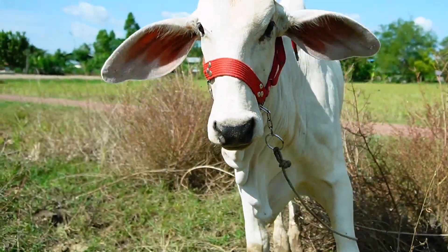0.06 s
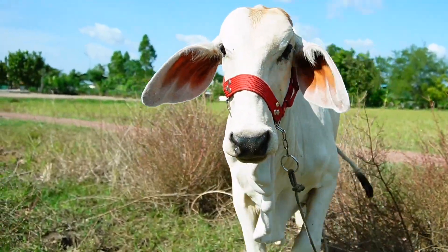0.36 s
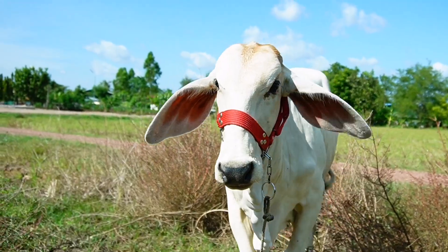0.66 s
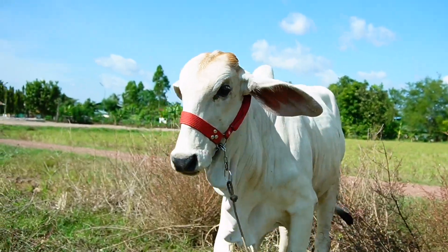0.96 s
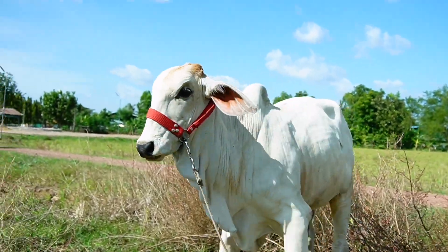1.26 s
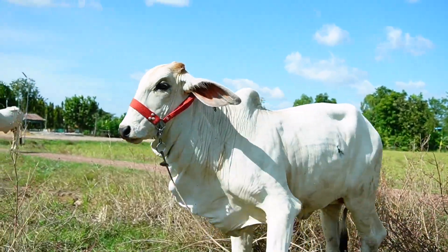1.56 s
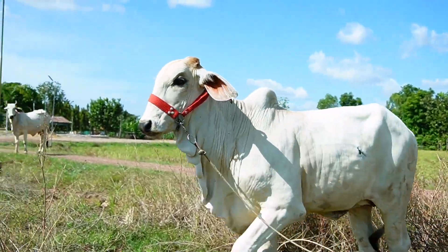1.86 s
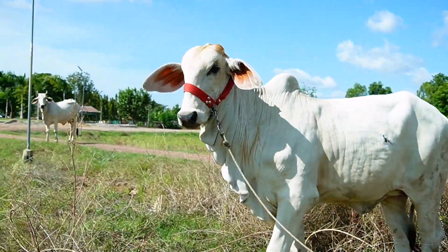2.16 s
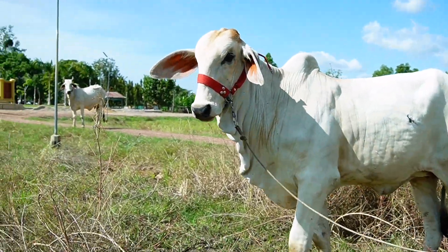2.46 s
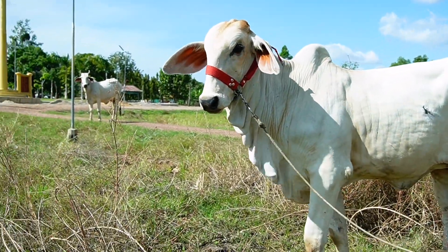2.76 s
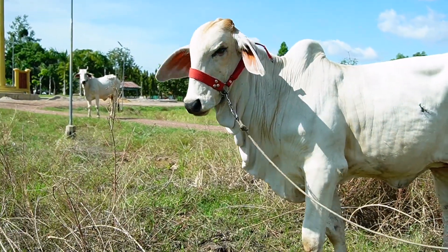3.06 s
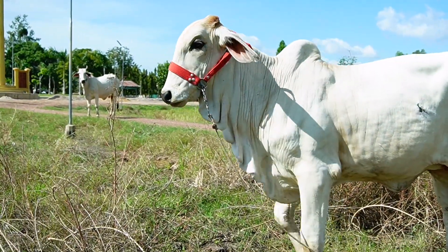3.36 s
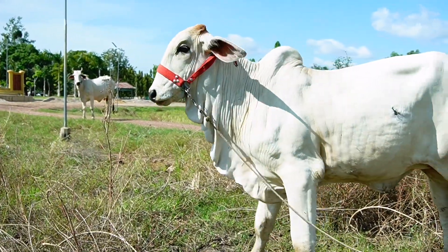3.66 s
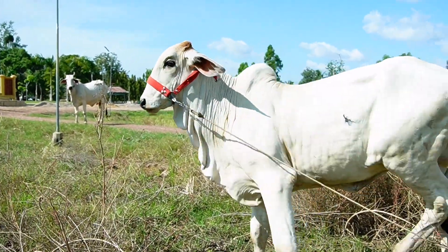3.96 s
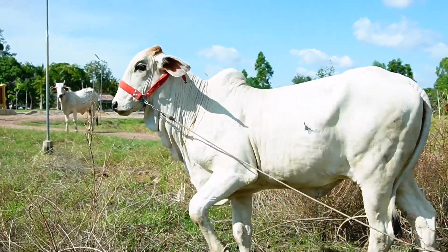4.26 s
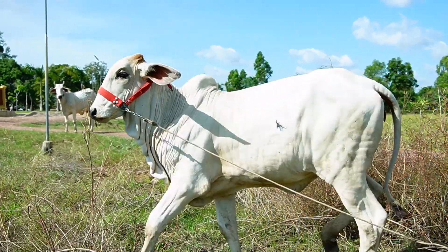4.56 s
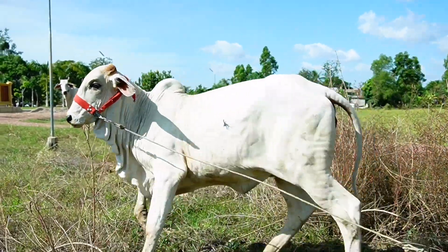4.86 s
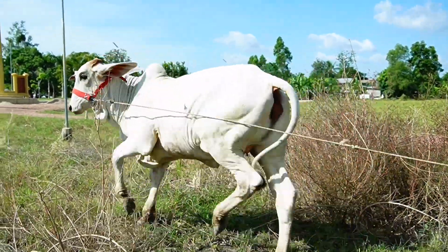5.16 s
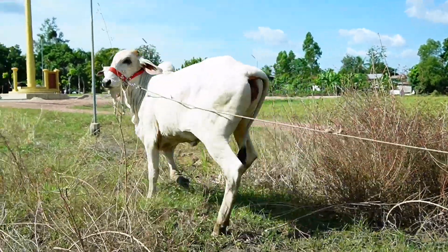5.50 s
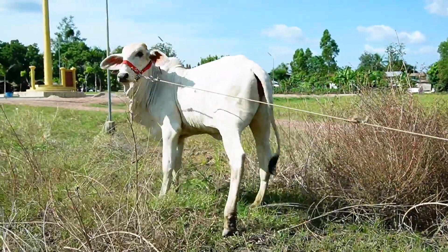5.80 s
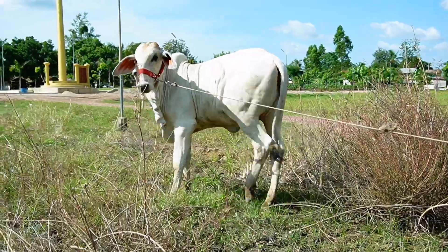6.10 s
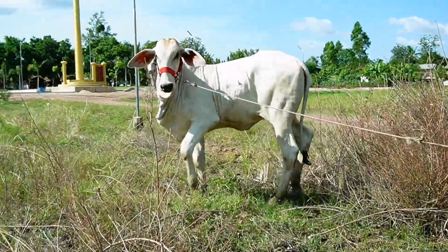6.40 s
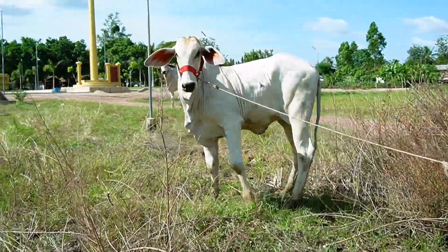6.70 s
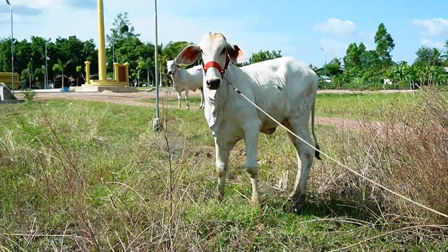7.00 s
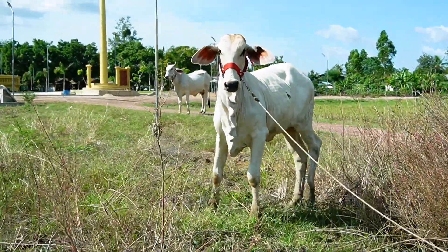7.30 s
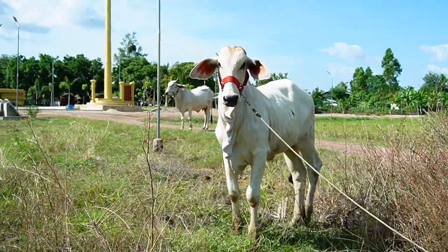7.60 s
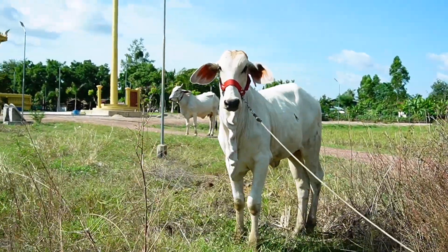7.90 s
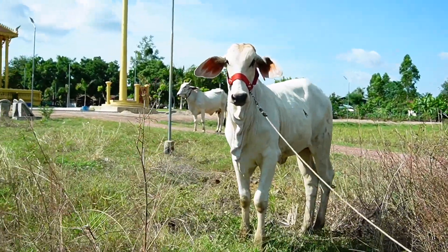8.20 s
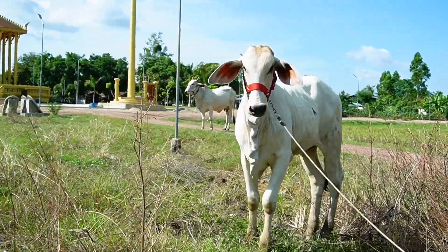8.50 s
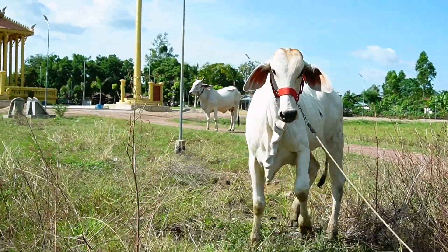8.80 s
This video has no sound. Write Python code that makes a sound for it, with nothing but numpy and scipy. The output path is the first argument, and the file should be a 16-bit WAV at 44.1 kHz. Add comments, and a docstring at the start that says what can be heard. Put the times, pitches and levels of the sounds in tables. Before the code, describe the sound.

Close, irregular rustling and crackling of dry grass comes from a tethered calf walking about, with sharp snaps and a few woody knocks from breaking stems. The steps are light at first, loudest and busiest just past the middle, and then more spaced out. Small birds give quick gliding chirps and faint whistles across the open field, while distant traffic drones low under soft wind.

```python
"""A tethered calf walks through dry grass, close by in an open field.
Its legs and rope rustle the blades, its hooves crunch the straw, and single stalks snap and knock:
dense trains of tiny fractures, and sharp cracks with a brief ring. Small birds chirp around the
field in quick gliding tones, over the rumble and drone of far traffic, soft gusts and a faint hiss."""
import sys
import numpy as np
from scipy import signal
from scipy.fft import rfft, irfft, next_fast_len
from scipy.io import wavfile

SR = 44100
rng = np.random.default_rng(int(sys.argv[2]) if len(sys.argv) > 2 else 0)


def unload_audio(sound):
    """Save the sound as a 16-bit wav file, at the path given as the first command line argument."""
    columns = np.transpose(np.atleast_2d(sound))
    # keep every value between -1 and 1, then stretch to whole-number steps
    steps = np.round(np.clip(columns, -1, 1) * 32767)
    wavfile.write(sys.argv[1], SR, steps.astype(np.int16))


N = 390285
TIME = np.arange(N) / SR


# Steady drag through the grass: t/s, level/dB
DRAG_LEVEL = [(0, -57), (.45, -61.5), (.8, -64.5), (1.2, -66), (1.5, -51.5), (2.25, -68.5), (2.85, -73),
              (3.35, -65), (4.05, -65), (4.15, -51), (4.6, -51), (5.7, -51), (5.9, -55), (6.7, -52.5),
              (6.95, -57.5), (7.7, -50.5), (8.05, -62), (8.5, -64), (8.85, -47)]
# Sweeps through a clump: peak t/s, length/s, blades/dB, straw/dB
CLUMP_SWISHES = [(0.244, 0.11, -48, -53), (0.537, 0.042, -53, -50), (0.655, 0.02, -50.5, -47.5),
                 (1.366, 0.09, -52.5, -49), (1.564, 0.051, -48, -45.5), (2.024, 0.022, -53, -53),
                 (3.776, 0.051, -60, -57), (4.667, 0.1, -40.5, -46.5), (4.881, 0.11, -43.5, -47.5),
                 (5.023, 0.017, -38, -42), (5.2, 0.16, -41, -46.5), (5.28, 0.067, -31.5, -42.5),
                 (5.392, 0.066, -37.5, -43.5), (5.571, 0.057, -41, -49), (5.672, 0.095, -38.5, -64),
                 (5.812, 0.091, -50, -52), (5.992, 0.046, -49, -43.5), (6.51, 0.16, -52, -69),
                 (6.646, 0.075, -50, -70), (6.745, 0.084, -44.5, -52), (7.642, 0.059, -46, -59),
                 (8.23, 0.1, -52.5, -47.5), (8.84, 0.063, -46.5, -61)]
def stir():
    """Legs and rope drag and swish through the grass; returns straw and blade levels in dB."""
    even_db, straw_follow = -54, 0.57
    rise_share = 0.46
    drag_db = np.interp(TIME, *np.transpose(DRAG_LEVEL))
    straw_power = gain_of(even_db + straw_follow * (drag_db - even_db)) ** 2
    blade_power = gain_of(drag_db) ** 2
    for s, length, blades_db, straw_db in CLUMP_SWISHES:
        near = slice(max(round((s - 2 * length) * SR), 0), round((s + 2 * length) * SR))
        u = (TIME[near] - s) / length
        swell = np.exp(-np.maximum(-u / rise_share, u / (1 - rise_share)) ** 1.25)
        straw_power[near] += gain_of(straw_db) ** 2 * swell
        blade_power[near] += gain_of(blades_db) ** 2 * swell
    return 10 * np.log10(straw_power), 10 * np.log10(blade_power)


# Coarse straw and fine blades: f/Hz, level/dB
STRAW_SPECTRUM = [(300, -7), (700, -12), (1150, -3), (2000, -3), (3200, -1.5), (4800, -2.5), (7000, -16.5),
                  (15000, -32)]
BLADE_SPECTRUM = [(1000, -19), (2500, 2), (4000, 4), (6500, 2), (10000, -1.5), (13000, -5), (16000, -9)]
def rustle():
    """Stirred straw and blades rub and crackle in clumps; single fibres tick above them."""
    straw_db, blades_db = stir()
    clumps = drift(23)
    ticks = spread(cracks(per_s=170, spread_db=5), apart=0.37)
    straw_rub = spread(cracks(per_s=5000, spread_db=0.5), apart=0.16)
    blade_rub = spread(cracks(per_s=8500, spread_db=-1), apart=0.7)
    straw = unit_rms(colour(straw_rub + 0.36 * ticks, STRAW_SPECTRUM))
    blades = unit_rms(colour(blade_rub, BLADE_SPECTRUM)) + gain_of(-7.5) * fibres()
    straw *= gain_of(straw_db + 2 * clumps + 4)
    blades *= gain_of(blades_db + 1.33 * clumps + 1.68)
    return straw + blades


def fibres(pitches=24, per_s=110, decay_s=0.00031):
    """Dry fibres tick as they slip or break, at many pitches and places, roughened by splinters."""
    t, out = TIME[:SR // 100], np.zeros((2, N))
    for hz in np.geomspace(2100, 12300, pitches):
        ring = np.sin(2 * np.pi * hz * t) * np.exp(-t / decay_s)
        splinters = (t == 0) + 0.074 * rng.standard_normal((2, len(t))) * np.exp(-t / 0.004)
        tick = signal.fftconvolve(splinters, ring[None], axes=1)
        for when, size, side in rng.random((round(per_s * N / SR / pitches), 3)):
            pan = np.sqrt([[.5 + side], [1.5 - side]])
            add(out, when * N / SR, gain_of(14 * size ** 2) * tick * pan)
    return unit_rms(out)


# Crushed tufts: t/s, length/s, level/dB, tilt/(dB/octave)
HOOF_CRUNCHES = [(0.293, 0.019, -38.5, 3), (0.559, .006, -46, 2), (0.644, 0.046, -38.5, -13.5),
                 (1.262, 0.032, -47, 0), (1.337, 0.023, -39, 2), (1.535, 0.013, -38.5, 6),
                 (1.567, .012, -40, 14), (2.009, 0.014, -42.5, 2), (4.035, 0.0072, -43, -5),
                 (4.104, 0.0055, -42, -1), (4.206, 0.02, -44.5, -3), (4.602, 0.0079, -42, -7),
                 (4.67, 0.0091, -32.5, 5), (4.687, 0.0046, -36, 8), (4.829, .006, -36, 10),
                 (4.888, 0.011, -37, 2.5), (4.991, 0.0097, -40, 16), (5.022, 0.018, -33.5, -5.5),
                 (5.093, 0.0058, -37.5, 2), (5.169, 0.047, -33, 7.5), (5.253, 0.015, -26.5, 12),
                 (5.283, 0.023, -27, 17), (5.285, 0.026, -31, -1.5), (5.327, 0.021, -31, 16),
                 (5.37, 0.0034, -13.5, 6), (5.679, 0.016, -38, 5), (5.759, 0.0073, -36, 7),
                 (5.97, 0.025, -45, -4), (6.626, 0.0055, -36, 12), (6.667, 0.0036, -39, 7),
                 (7.631, 0.0037, -33.5, 19), (7.648, 0.0032, -33, 13), (7.672, .008, -39, 6),
                 (7.933, 0.0061, -38.5, 1)]
# Breaking tuft: f/Hz, level/dB
TUFT_SPECTRUM = [(200, 6.5), (600, -10), (1100, 7), (1600, 1), (3000, 11.5), (6000, 4.5), (11000, -9),
                 (16000, -22)]
def crunches():
    """A hoof breaks a whole tuft: a dense burst of fractures that swells fast and dies away."""
    out = np.zeros((2, N))
    for s, length, db, tilt_db in HOOF_CRUNCHES:
        u = TIME[:SR // 4] / length
        fractures = spread(cracks(per_s=9100, spread_db=1.5, size=len(u)), apart=0.24)
        burst = unit_rms(colour(fractures, TUFT_SPECTRUM, tilt_db))
        envelope = (1 - np.exp(-u / 0.016)) * np.exp(-u ** 4)
        add(out, s, gain_of(db) * burst * envelope)
    return out


# Breaking stalks, and one hoof knock at 5.297 s: t/s, level/dB, ring f/Hz, low knock/dB, high crack/dB
STALK_SNAPS = [(.178, -21, 3940, -34, -42), (.477, -35, 6000, -30, -16), (0.4921, -23.5, 3800, -27, -38),
               (0.5415, -22, 4500, -44, -22), (.9033, -30, 3650, -14, -18), (1.4565, -12, 3230, -26, -19),
               (1.4864, -14, 3730, -27, -14), (1.5933, -10.5, 7600, -36, -11),
               (1.761, -11, 4170, -23, -17.5), (1.808, -15.5, 3400, -16, -13.5),
               (1.832, -26, 2700, -16, -36), (2.041, -9, 4150, -23, -21.5), (2.076, -20, 1170, -12, -15),
               (2.393, -22.5, 3050, -12.5, -30), (2.676, -27, 2160, -12, -35),
               (3.273, -25.5, 4750, -22, -39), (3.457, -22, 2150, -12, -35),
               (3.7345, -26.5, 2290, -37, -24), (3.8623, -22.5, 4100, -27, -31),
               (4.7863, -13, 9140, -22, -18), (5.1704, -10, 3150, -16, -21), (5.2568, -14, 3200, -18, -10),
               (5.2692, -6, 4500, -28, -17), (5.286, -12, 2620, -11, -6), (5.297, -12, 1100, -8, -25),
               (5.3554, -12.5, 3960, -21, -9), (5.3715, -8, 3800, -32, 9), (5.461, -15, 5260, -36, -24),
               (5.6628, -2.5, 11550, -33, -2.5), (6.087, -20.5, 4130, -7, -11),
               (6.133, -18.5, 2600, -14, -63), (6.4376, -16, 3180, -20, -8), (6.5178, -21, 6460, -27, -5),
               (6.522, -13, 4860, -26, -12), (6.526, -17, 5600, -30, -9), (6.6199, -18, 10500, -37, -6),
               (6.7163, -19, 4770, -18, 1), (6.7407, -3.5, 3300, -39, 7), (6.83, -24.5, 2200, -4, -38),
               (7.047, -10.5, 3350, -18.5, -21), (7.206, -21, 2700, -10, -31), (7.795, -20, 4300, -30, -26),
               (7.9343, -22, 3660, -10, -33), (8.0285, -28, 6200, -22, -19), (8.1695, -23, 3400, -4, -12),
               (8.274, -12.5, 3420, -20.5, -17), (8.7081, -9, 4800, -34, -13)]
def snaps(twigs=14):
    """Thick stalks break, a hoof knocks once, and a few thin twigs snap at random moments."""
    out = np.zeros((2, N))
    for s, *stalk in STALK_SNAPS:
        add(out, s + 0.001002, snap(*stalk))
    for when, size, pitch in rng.random((twigs, 3)):
        twig = snap(db=-36 + 5 * size, hz=2200 + 2400 * pitch, knock_db=-17.5, crack_db=-35)
        add(out, when * N / SR, twig)
    return out


def snap(db, hz, knock_db, crack_db):
    """A stalk cracks, splinters and rings briefly; the thick stem below the break knocks."""
    t = TIME[:SR // 16]
    splinters = spread(rng.standard_normal((3, len(t))), apart=0.37)
    splinters *= np.exp(-t / 0.0016) + 0.19 * np.exp(-t / 0.011)
    spectrum = [(120, knock_db - 37), (500, knock_db + 1), (1200, knock_db + 10),
                (4000, 0), (11000, crack_db + 10), (16000, crack_db)]
    crack = colour((t == 0) + 0.12 * splinters, spectrum)
    crack /= np.linalg.norm(crack[0])
    ring_t60_s, stem_t60_s = 0.017 * np.sqrt(4000 / hz), 0.014
    ring = np.sin(2 * np.pi * hz * t) * gain_of(-60 * t / ring_t60_s) * (1 - np.exp(-t / 0.00019))
    ring *= 0.45 / np.linalg.norm(ring)
    stem_hz = 1363 * rng.uniform(0.82, 1.144)
    stem = np.sin(2 * np.pi * stem_hz * t) * gain_of(-60 * t / stem_t60_s)
    stem *= gain_of(min(knock_db + 4, -7)) / np.linalg.norm(stem)
    return gain_of(db + 5.5) * (crack + ring + stem)


# Hollow stems, and a hoof knock at 5.297 s: t/s, f/Hz, decay/s, level/dB
STEM_KNOCKS = [(1.762, 1390, 0.0057, -32), (2.042, 1380, 0.011, -37), (2.077, 1150, 0.0033, -39),
               (5.027, 1180, 0.008, -36), (5.281, 1110, 0.018, -34), (5.297, 1060, 0.0039, -29),
               (5.370, 720, 0.0051, -34.5)]
def knocks(wander_hz=100):
    """Hollow stems give way, and a hoof strikes, with a short, rough, woody knock."""
    t, out = TIME[:SR // 8], np.zeros((2, N))
    for s, hz, decay_s, db in STEM_KNOCKS:
        ring = tone(hz + wander_hz * drift(430, size=len(t)))
        envelope = (1 - np.exp(-t / .0005)) * np.exp(-t / decay_s)
        add(out, s, gain_of(db) * ring * envelope)
    return out


# Two-syllable calls: t/s, delay of second/s, first f/Hz, level/dB, second f/Hz, level/dB
FALLING_CALLS = [(1.245, .03, 5190, -46, 3800, -45), (2.636, 0.044, 4840, -43.5, 3950, -43.5),
                 (4.298, 0.048, 5200, -48, 3780, -37.5), (4.522, 0.044, 5120, -44, 3600, -42),
                 (7.114, 0.049, 5100, -38.5, 4100, -35.5), (7.322, 0.05, 5020, -40, 4030, -37.5),
                 (8.549, 0.04, 5100, -41.5, 3840, -36), (8.72, 0.052, 4650, -36.5, 3760, -34.5)]
# Plunging warble; upward sweep with a low tail: t in call/s, f/Hz, level/dB
WARBLE_CONTOUR = [(0, 6380, -18), (.009, 5007, -0.5), (.016, 4570, -2), (.021, 4954, 5.5), (.028, 3894, -9),
                  (.036, 4526, -5), (.042, 3600, -4), (.062, 3180, -6), (.09, 2840, -15)]
SWEEP_CONTOUR = [(0, 3200, -13), (.021, 4300, -4), (.03, 5400, -11), (.04, 4100, -2), (.051, 3406, -3),
                 (.068, 3100, -4.5), (.083, 2560, -13), (.105, 2330, -11)]
# Calls on those contours: t/s, pitch ratio, level/dB
WARBLE_CALLS = [(2.465, 0.99, -41), (3.644, 0.97, -39), (3.752, 0.91, -46), (3.899, 0.86, -47),
                (6.357, 1.02, -38.5), (7.458, 1.01, -36)]
SWEEP_CALLS = [(4.011, 1, -41), (6.689, 1.01, -33)]
# Single pips: t/s, start f/Hz, end f/Hz, level/dB
BIRD_PIPS = [(.09, 3220, 2970, -47), (.605, 4520, 4580, -47.5), (.678, 3250, 3900, -52),
             (.757, 3400, 3500, -46), (.79, 3060, 3780, -47), (1.085, 4350, 3350, -50),
             (2.24, 4130, 4100, -55), (2.272, 4950, 4550, -47), (2.303, 3600, 3080, -44),
             (2.772, 3420, 3620, -54), (2.939, 4050, 4130, -47), (2.97, 3000, 2870, -47),
             (3.14, 3500, 3240, -49), (4.832, 4500, 4850, -37), (5.565, 4900, 3500, -44),
             (6.888, 3900, 3300, -44), (7.845, 3350, 4120, -44), (7.98, 3770, 2780, -44.5),
             (8.374, 5100, 4960, -53), (8.668, 3420, 3150, -48)]
def birds():
    """The nearer birds give falling, warbling and sweeping calls and short pips."""
    out = np.zeros((2, N))
    first_tune, second_tune = np.array([[1.24, 1.14, 1, .96, .92], [1.06, 1.01, .94, .84, .83]])
    for s, delay, first_hz, first_db, second_hz, second_db in FALLING_CALLS:
        add(out, s, gain_of(first_db) * chirp(.036, first_hz * first_tune, peak=0.52))
        add(out, s + delay, gain_of(second_db) * chirp(.045, second_hz * second_tune, peak=0.29))
    for calls, contour in (WARBLE_CALLS, WARBLE_CONTOUR), (SWEEP_CALLS, SWEEP_CONTOUR):
        for s, ratio, db in calls:
            add(out, s, gain_of(db) * slide(contour, ratio))
    for s, start_hz, end_hz, db in BIRD_PIPS:
        arch_hz = 1.04 * (start_hz + end_hz) / 2
        add(out, s, gain_of(db) * chirp(.0322, [start_hz, arch_hz, end_hz], peak=0.41))
    return out


def chirp(length_s, tune_hz, peak):
    """A buzzy slur through pitches evenly spaced in time, accented at the share peak of its length."""
    t = TIME[:SR // 8]
    u = np.minimum(t / length_s, 1)
    buzz = rng.uniform(.01, .045) * np.sin(2 * np.pi * (rng.uniform(90, 220) * t + rng.random()))
    hz = np.interp(u, np.linspace(0, 1, len(tune_hz)), tune_hz)
    hz *= 1 + buzz + .012 * drift(280, size=len(t))
    flutter_db = 2.6 * drift(220, size=len(t))
    swell = abs(np.sin(np.pi * u)) ** .5 * gain_of(2 - 18 * abs(u - peak) + flutter_db)
    return leaves(rasp(swell * tone(hz)))


def slide(contour, ratio):
    """A bird's thin, fluttering whistle along a contour."""
    t = TIME[:SR // 6]
    at_s, hz, db = np.transpose(contour)
    pitch_hz = ratio * np.interp(t, at_s, hz) * (1 + .017 * drift(280, size=len(t)))
    gate = np.clip(np.minimum(t, at_s[-1] - t) / .003, 0, 1)
    flutter_db = 2.4 * drift(200, size=len(t))
    envelope = gate * gain_of(np.interp(t, at_s, db) + flutter_db)
    return leaves(rasp(envelope * tone(pitch_hz)))


def rasp(note, depth=.3, rate_hz=600):
    """Fast level flicker gives a bird's note a raspy edge."""
    return note * (1 + depth * drift(rate_hz, size=len(note))) / np.hypot(1, depth)


def leaves(note, share=.28, decay_s=.007):
    """Leaves around the bird blur its note, differently left and right."""
    t = TIME[:len(note)]
    scatter = rng.standard_normal((2, len(t))) * (1 - np.exp(-t / .002)) * np.exp(-t / decay_s)
    scatter /= np.linalg.norm(scatter[0])
    return note + share * signal.fftconvolve(note[None], scatter, axes=1)[:, :len(t)]


def flock(count=280):
    """Many birds twitter faintly in the far trees."""
    out = np.zeros((2, N))
    for when, length, first, last, size, side in rng.random((count, 6)):
        note = chirp(0.0241 + .04 * length, [3000 + 2000 * first ** 2, 2800 + 1600 * last], peak=0.52)
        pan = np.sqrt([[side], [1 - side]])
        add(out, when * N / SR, gain_of(-57 + 3 * size) * note * pan)
    return out


# Faint whistles: t/s, length/s, f/Hz, level/dB, waver as a share of f
FAR_WHISTLES = [(.68, 0.64, 2210, -63, .014), (2.87, 0.44, 2107, -60, .03),
                (3.27, 0.46, 2090, -56.5, 0.025), (3.77, 0.28, 3010, -56, .014),
                (7.1, 0.18, 1858, -52, 0.012), (7.24, .19, 1880, -51.5, .012),
                (7.46, 0.25, 1873, -58, .015), (7.95, 0.3, 1557, -55.5, .022),
                (8.14, .3, 1562, -56.5, .026)]
def whistles():
    """Long soft notes from far off swell quickly, waver and linger."""
    out = np.zeros((2, N))
    for s, length, hz, db, waver in FAR_WHISTLES:
        u = np.minimum(TIME[:SR] / length, 1)
        pitch_hz = hz * (1 + waver * drift(135, size=SR))
        swell = abs(np.sin(np.pi * np.sqrt(u))) ** 1.3 * gain_of(2.5 * drift(25, size=SR))
        add(out, s, gain_of(db) * swell * tone(pitch_hz))
    return out


# Echo decay: f/Hz, T60/s
FIELD_T60 = [(500, 0.042), (3000, 0.18), (7000, 0.14), (15000, 0.073)]
def field_echoes(x):
    """Thin, diffuse echoes off bushes and trees, different left and right."""
    hz, t, noise = signal.stft(rng.standard_normal((2, SR // 2)), SR, nperseg=256)
    decay = gain_of(-60 * t / at_hz(FIELD_T60, hz)[:, None])
    tail = signal.istft(noise * decay, SR, nperseg=256)[1]
    return signal.fftconvolve(x, tail / np.linalg.norm(tail[0]), axes=1)[:, :N]


# Traffic rumble: f/Hz, level/dB
RUMBLE_SPECTRUM = [(20, -47.5), (31, -32), (38, -9.5), (45, 0), (60, -0.5), (85, -4.5), (160, -4),
                   (250, -9.5), (400, -20), (700, -38), (1500, -62)]
# Its rise and fall: t/s, level/dB
RUMBLE_LEVEL = [(0, -45), (.7, -43.5), (1.6, -44.5), (3.3, -43.5), (4, -42.5), (5.8, -42), (6.2, -44.5),
                (8.85, -45.5)]
# Engines: peak t/s, half length/s, f/Hz, width/Hz, level/dB
ENGINE_DRONES = [(0.547, 0.11, 103, 8.1, -46.5), (1.1, 0.99, 99, 6.8, -51), (2.62, 0.12, 104.1, 12, -43.5),
                 (3.053, .25, 99.35, 8, -46.5), (3.0, 0.34, 180, 12, -51), (3.6, 0.96, 134.2, 7.5, -53.5),
                 (3.698, 0.23, 166.6, 10, -52), (4.1, 0.59, 103, 7.4, -48.5), (5.05, .3, 262.2, 5.07, -53),
                 (5.152, .3, 78, 6.6, -48.5), (6.9, 0.56, 78.3, 5, -52.5), (5.882, 0.12, 160, 5.7, -48),
                 (6.1, 0.89, 106.2, 7.2, -52), (8.1, .9, 103.6, 5.8, -48.5)]
def traffic():
    """Far traffic rumbles; single engines drone in it, swelling and fading."""
    rumble = unit_rms(colour(rng.standard_normal((1, N)), RUMBLE_SPECTRUM, size=16384))
    rumble *= gain_of(np.interp(TIME, *np.transpose(RUMBLE_LEVEL)) - 0.5)
    drones = sum(gain_of(db) * np.exp(-.5 * ((TIME - s) / half) ** 2) * hum(hz, width_hz)
                 for s, half, hz, width_hz, db in ENGINE_DRONES)
    return rumble + drones


# Wind gusts: peak t/s, half length/s, level/dB
WIND_GUSTS = [(.37, .12, -43), (1.05, 0.16, -53), (1.47, 0.084, -42), (2.1, 0.14, -42), (2.5, 0.088, -46.5),
              (3.14, .17, -46), (3.7, .1, -53), (4.07, 0.26, -43.5), (4.9, .15, -44), (5.65, .2, -45.5),
              (7.402, 0.27, -46), (8.3, 0.18, -46)]
def gusts():
    """Soft wind gusts add deep swells."""
    swells = sum(gain_of(db - 1) * np.exp(-((TIME - s) / half) ** 2) for s, half, db in WIND_GUSTS)
    return swells * hum(hz=46.5, width_hz=6.9)


def hum(hz, width_hz):
    """A low tone wandering in pitch and strength."""
    strength = gain_of(2.7 * drift(6.1))
    return unit_rms(strength * tone(hz + .5 * width_hz * drift(11.77)))


# Field hiss: f/Hz, level/dB
AIR_SPECTRUM = [(200, -22), (450, 0), (750, -2), (1250, 0), (1800, -2.5), (2150, -2), (2550, -4),
                (3200, -6.5), (4800, -8), (6000, -19), (9000, -30), (15500, -34)]
def air():
    """The open field hisses softly; faint low noise in opposite phase widens the background."""
    hiss = unit_rms(colour(spread(rng.standard_normal((3, N)), apart=0.57), AIR_SPECTRUM))
    # long waves reach both sides alike, shorter ones differ a little
    side_spectrum = [(30, -34), (90, -17), (180, 4.5), (300, 2.5), (700, -11), (2000, -18)]
    side = unit_rms(colour(rng.standard_normal((1, N)), side_spectrum, size=4096))
    return gain_of(-54 + 0.66 * drift(6.4)) * hiss + gain_of(-64.5) * side * [[1], [-1]]


def cracks(per_s, spread_db, size=N):
    """Three trains of tiny fractures, random in time and strength."""
    strength = gain_of(spread_db * np.minimum(rng.exponential(1, (3, size)), 4))
    impulses = strength * rng.standard_normal((3, size))
    return unit_rms(impulses * (rng.random((3, size)) < per_s / SR))


def drift(hz, size=N):
    """Random wander of rms 1, rolling off above hz."""
    padded = next_fast_len(size, True)
    lowpass = np.exp(-(np.fft.rfftfreq(padded, 1 / SR) / hz) ** 2)
    return unit_rms(irfft(rfft(rng.standard_normal(padded)) * lowpass, padded)[:size])


def colour(x, spectrum, tilt_db=0, size=512):
    """Minimum-phase filter with the given spectrum, tilted by tilt_db per octave in the treble."""
    hz = abs(np.fft.fftfreq(size, 1 / SR))
    log_gain = np.log(gain_of(at_hz(spectrum, hz) + tilt_db * np.log2(hz / 1000 + 1)))
    taps = np.fft.ifft(np.exp(np.conj(signal.hilbert(log_gain)))).real[:size // 2]
    return signal.oaconvolve(x, taps[None], axes=1)[:, :x.shape[1]]


def spread(three, apart):
    """Stereo from one shared signal and one per side."""
    return (three[0] + apart * three[1:]) / np.hypot(1, apart)


def tone(hz):
    """Sine following a pitch curve."""
    return np.sin(2 * np.pi * np.cumsum(hz) / SR)


def at_hz(points, hz):
    """Interpolates on a log-frequency axis."""
    f, value = np.transpose(points)
    return np.interp(np.log(hz + 1), np.log(f + 1), value)


def gain_of(db):
    """Decibels to a factor."""
    return 10 ** (np.asarray(db) / 20)


def unit_rms(x):
    """Scales to rms 1."""
    return x / np.sqrt(np.mean(x ** 2) + 1e-20)


def add(mix, s, sound):
    """Lays a stereo sound into the mix at time s."""
    part = mix[:, max(round(s * SR), 0):][:, :sound.shape[-1]]
    part += sound[..., :part.shape[-1]]


def scene():
    """Near grass has almost no echo; the birds, the nearer ones to the left, carry more."""
    grass = (rustle() + crunches() + knocks() + snaps()) * gain_of([[.3], [-.3]])
    song = birds() * gain_of([[1.5], [-1.5]])
    far = flock() + whistles()
    echoes = field_echoes(gain_of(-16) * grass + gain_of(-8) * song + far)
    return grass + song + far + echoes + traffic() + gusts() + air()


def record(dry):
    """Band limit at 15.8 kHz."""
    lowpass = signal.firwin(511, 15800, window=("kaiser", 9), fs=SR)
    return signal.oaconvolve(dry, lowpass[None], "same")


dry = scene()
out = record(dry)
unload_audio(out)
```